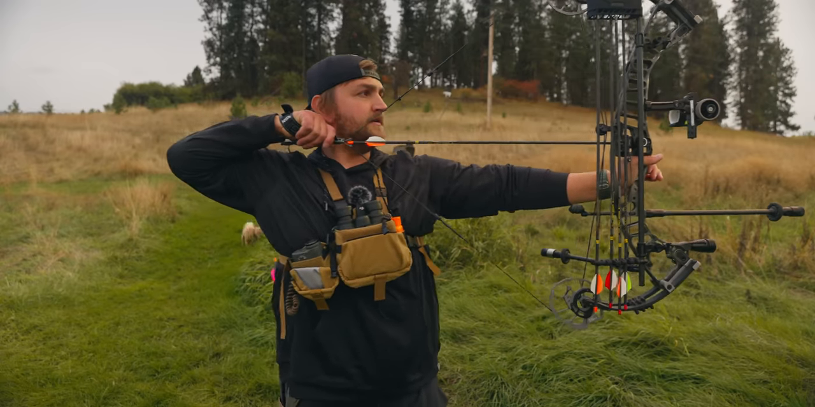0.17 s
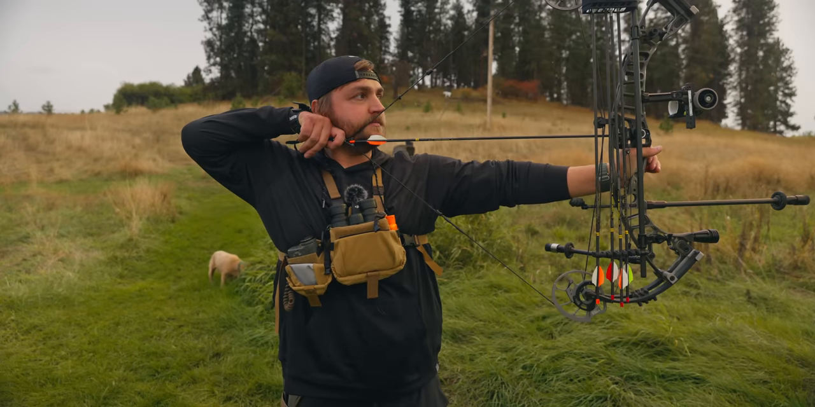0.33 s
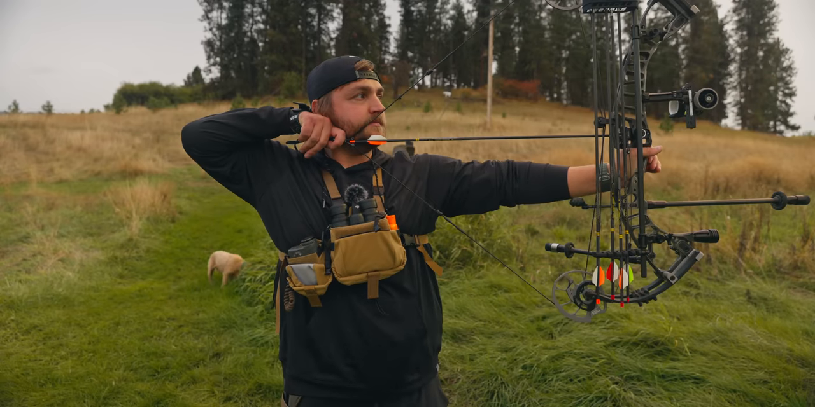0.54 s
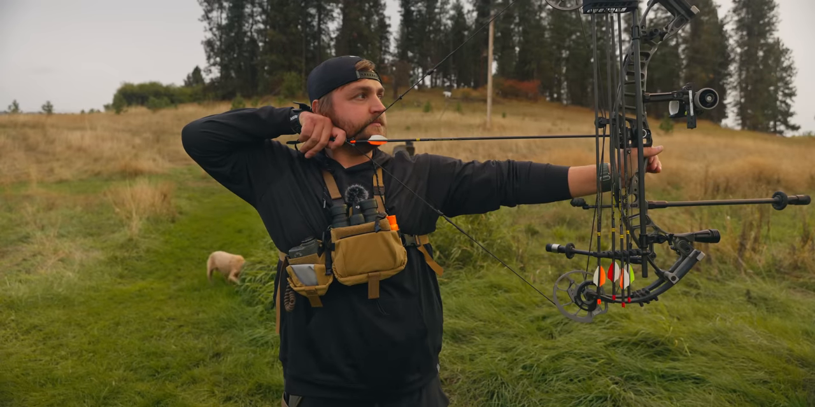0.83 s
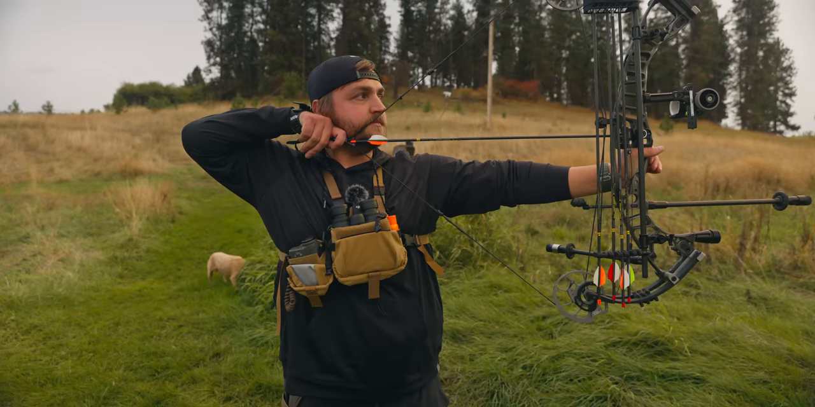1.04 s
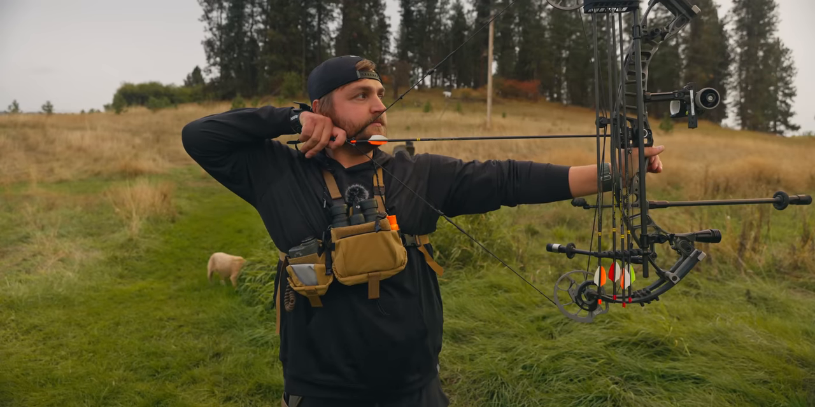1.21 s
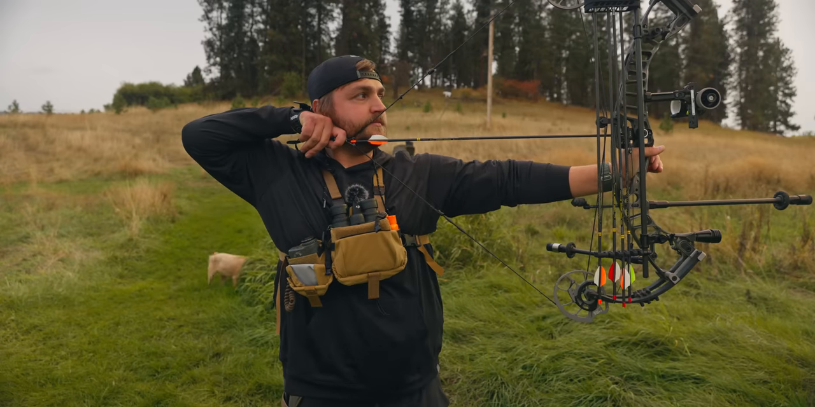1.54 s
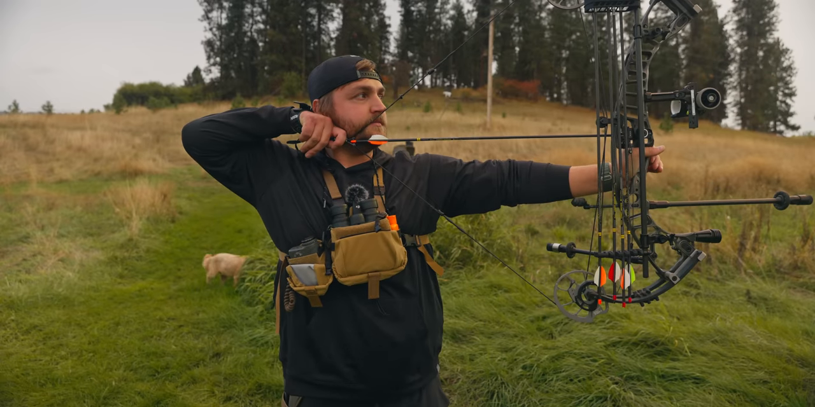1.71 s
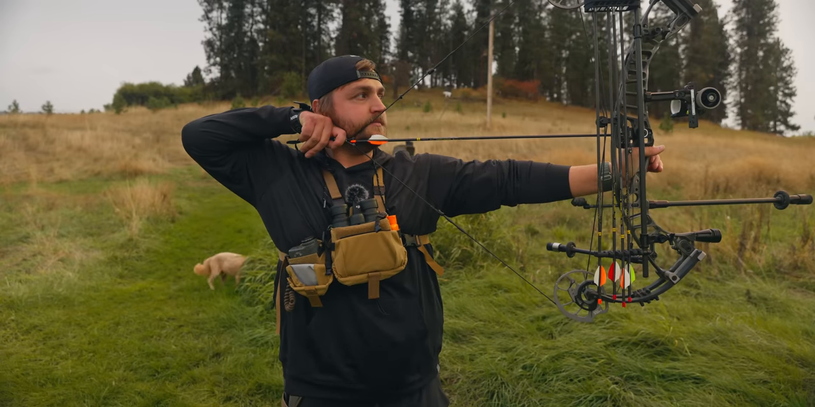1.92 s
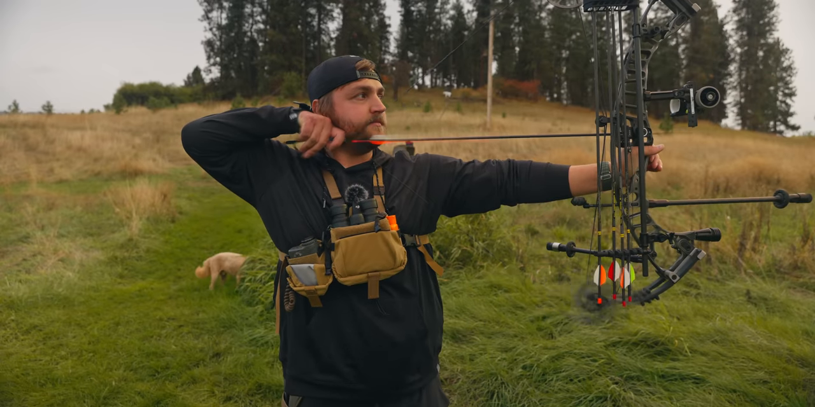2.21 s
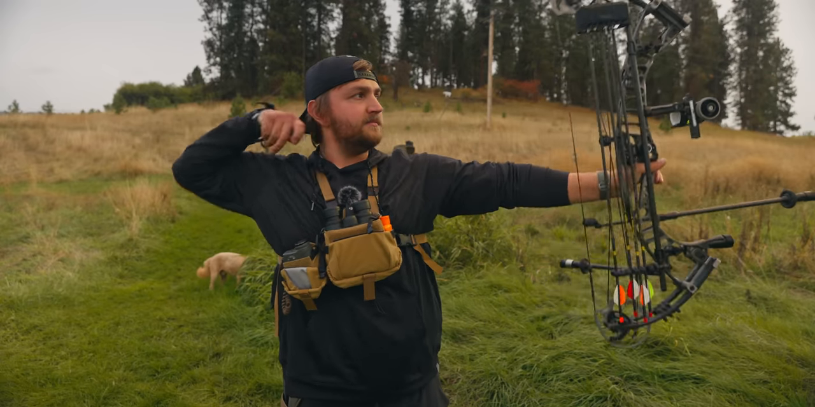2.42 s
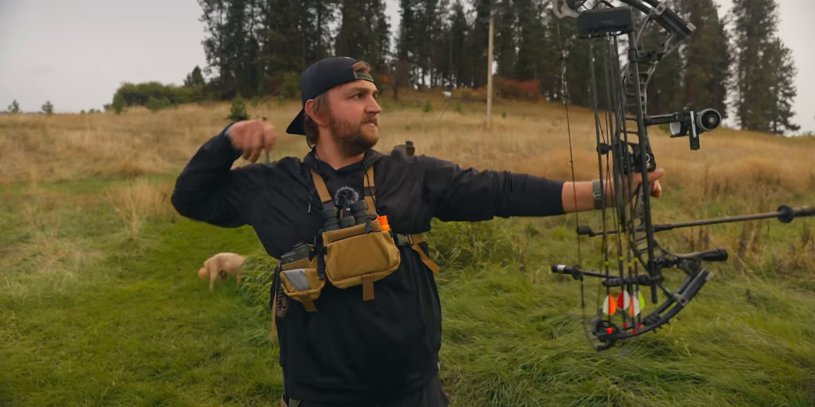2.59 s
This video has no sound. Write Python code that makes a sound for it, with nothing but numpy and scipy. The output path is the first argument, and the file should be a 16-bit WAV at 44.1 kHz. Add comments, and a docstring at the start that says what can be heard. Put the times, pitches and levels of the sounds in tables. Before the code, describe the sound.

Loud crack of a compound bow released outdoors, a brief twang, then faint rattling of loose parts

```python
"""Quiet meadow, one microphone: far wind in trees over microphone hiss, nearer 1-2 kHz wind noise that swells and dies
down, one coo of a far dove, then a light rustle of leaves, all shaped noise but the sine coo. A compound bow goes
off: its release aid clicks (ringing modes), the string whistles forward (gliding sine) and slaps its stop, limbs
and cables ring (decaying modes) under bursts of hiss. A loose part then rattles (taps and noise ticks), the bow
bumps in the hand (falling sines), and last some gear squeaks (narrow noise)."""
import sys
import numpy as np
from scipy import signal
from scipy.fft import rfft, irfft
from scipy.io import wavfile
from scipy.ndimage import uniform_filter1d

SR = 44100
rng = np.random.default_rng(int(sys.argv[2]) if len(sys.argv) > 2 else 0)


def store_pcm(level_fs):
    """Save levels as 16-bit WAV."""
    pcm = np.round(np.clip(level_fs, -1, 1) * 32767).astype(np.int16)
    wavfile.write(sys.argv[1], SR, np.atleast_2d(pcm).T)


N = 121275
T = np.arange(N) / SR  # s

# clicks of the release aid: t/s, level/dB, tilt/(dB per octave, about 6 kHz)
CLICKS = [(2.2868, -19.5, -1), (2.288, -6.5, 2.5), (2.2879, -12, -1), (2.2934, -5, 2), (2.2935, -8, -1.5),
          (2.2956, -27, -8)]
# modes of the release aid, before the common pitch factor in ring(): f/Hz, level/dB, t60/s
RELEASE_MODES = [(700, -16, 0.0033), (1920, -9, .003), (3760, -7, .003), (4600, -10.5, 0.0023),
                 (6060, -2, 0.0037), (7000, -22, .04), (7670, -3.5, 0.0036), (8900, -4, .003),
                 (10500, -8, 0.0033), (10960, -30, .04), (12600, -2.5, .004), (15100, -11, .0025)]
# blows of string and cables on their stops: t/s, level/dB, contact/s
BLOWS = [(2.3103, -13.5, .0002), (2.3114, -7, 0.0002), (2.3133, -2.5, .0001), (2.3162, -8, .00015),
         (2.3201, -9.5, 0.00043), (2.3255, -8, .0004), (2.338, -18, .0005), (2.346, -23, 0.00027)]
# short modes of limbs and riser, before the pitch factor: f/Hz, level/dB, t60/s
LIMB_MODES = [(264, -12, 0.041), (341, -9, 0.036), (520, -13.5, 0.036), (669, -13, .03),
              (777.5, -7.5, 0.041), (841, -7.5, 0.057), (950, -12, 0.035), (1057, -8.5, 0.018),
              (1186, -9, .015), (1266, -2.5, 0.022), (1520, -13.5, .015), (1690, -4, 0.018)]
# string and cables humming on, before the pitch factor: f/Hz, level/dB, t60/s, rise/s
CABLE_MODES = [(152, -29, 0.13, 0.0053), (266.6, -28, .2, .01), (385, -35, 0.48, .06),
               (512, -13.5, .11, .02), (543.2, -17.5, .12, .02), (588, -1.5, 0.14, .04),
               (741, -18.5, 0.22, 0.011), (785, -17.5, 0.13, 0.008), (881.6, -24, 0.11, 0.03),
               (1214, -40.5, 0.16, .01)]
# layers of hiss around the shot: start t/s, rise/s, level/dB, t60/s, centre f/Hz, one-pass width/Hz
HISS_LAYERS = [(2.3085, .0025, -14, .022, 12500, 6000), (2.305, .006, -17, 0.061, 7000, 11000),
               (2.311, .004, -33, 0.16, 9000, 14000), (2.311, .003, -24.5, .1, 1400, 1800),
               (2.32, .02, -52, .8, 1600, 2600), (2.32, .02, -59.5, .9, 9000, 7000),
               (2.32, .02, -43.5, 0.61, 600, 1100), (2.287, .001, -28, .1, 5000, 18000),
               (2.295, .012, -31.5, .05, 1800, 2200)]
# low taps of a loose part: t/s, level/dB
TAPS = [(2.4104, -50.5), (2.4324, -48), (2.4594, -50), (2.5097, -49.5), (2.5356, -50), (2.5624, -58),
        (2.5915, -53), (2.6224, -53), (2.6524, -52), (2.6798, -53)]
# modes of that part, before each tap's own pitch scatter: f/Hz, level/dB, t60/s
TAP_MODES = [(2079, 1.5, 0.019), (2525, -1.5, 0.0124)]
# bright ticks of the same rattle: t/s, level/dB
TICKS = [(2.4054, -56), (2.4524, -57), (2.4922, -51), (2.5199, -52), (2.5461, -51), (2.5734, -64),
         (2.6024, -57), (2.6335, -61), (2.7274, -58)]
# noise bands of a tick: f/Hz, one-pass width/Hz, level/dB
TICK_BANDS = [(5500, 1500, -14), (8800, 2300, -9), (11400, 2500, -7)]
# bumps of the bow in the hand: t/s, level/dB, start f/Hz, end f/Hz, t60/s
BUMPS = [(2.482, -43, 400, 140, 0.11), (2.492, -54, 110, 85, 0.075), (2.498, -48.5, 298, 145, 0.0366),
         (2.564, -56, 130, 120, 0.046), (2.62, -46, 590, 240, 0.027)]
# strokes of a thin squeaky scrape of gear: t/s, length/s, level/dB
STROKES = [(2.66, 0.076, -78.5), (2.70, 0.025, -74), (2.727, .015, -69), (2.738, .03, -69)]
# resonances of the scrape: f/Hz, one-pass width/Hz, level/dB
SQUEAK_BANDS = [(4450, 326, 0.5), (5000, 800, -4), (5720, 400, -6), (12320, 300, -10.5), (3000, 3000, -0.5),
                (9500, 6500, -2.5)]
# light rustle of leaves in the treble: t/s, level/dB
RUSTLE = [(1.35, -100), (1.6, -85), (1.82, -78), (1.95, -96)]
# wind in the 1-2 kHz range that swells a little, then dies down: t/s, level/dB
WIND = [(0, -80.5), (.45, -75.5), (1, -78.5), (1.3, -93)]
# spectrum of the meadow, relative (its overall level is set below): f/Hz, level/(dB per Hz)
MEADOW_SPECTRUM = [(18, -63), (30, -33.5), (118, -7), (199, -9), (239, -4.5), (437, -1), (780, -1.5),
                   (1070, -8), (1760, -14.5), (2060, -20), (3310, -25), (13700, -23.5), (16000, -28.5)]

WHISTLE_S, WHISTLE_LENGTH_S = 2.3045, 0.0069
WHISTLE_FROM_HZ, WHISTLE_TO_HZ = 1900, 4100
WHISTLE_END_DB, WHISTLE_SWELL_DB = -16.5, 6.5
CABLES_S, CABLES_WAVER_DB = 2.312, 1.5
RELEASE_CUT_HZ, LIMBS_CUT_HZ = 610, 203  # small bodies radiate little below these
TAP_RISE_S, TAP_SCATTER, TICK_T60_S = .0008, .04, 0.01  # scatter: relative spread of pitch
BUMP_GLIDE_S = 0.0043  # time constant of the pitch drop
BOW_CUT_HZ, BUMP_CUT_HZ = 84, 62
COO_S, COO_LENGTH_S, COO_EDGE_S = .803, 0.18, 0.0106
COO_START_HZ, COO_SAG_HZ_PER_S = 616, 57
COO_DB, COO_WAVER_DB, COO_THROB_HZ, COO_THROB_DB = -60, 1.5, 18, 2.5
RUSTLE_HZ, RUSTLE_WIDTH_HZ = 6500, 8200
WIND_HZ, WIND_WIDTH_HZ = 1600, 1500
MEADOW_DB, SWELL_DB, FLICKER_DB = -64.5, .5, 1
OPENING_DB, OPENING_S = 0.5, .2  # extra level at the start and its time constant
TOP_HZ = 15900


def release_clicks():
    """The small body of the release aid rings at each click, tilted duller or brighter."""
    clicks = sum(undb(db) * ring(s, RELEASE_MODES, tilt_db=tilt) for s, db, tilt in CLICKS)
    return high(clicks, RELEASE_CUT_HZ)


def string_whistle():
    """The string sings higher and louder as it speeds through the air."""
    progress = np.clip((T - WHISTLE_S) / WHISTLE_LENGTH_S, 0, 1)
    hz = WHISTLE_FROM_HZ + (WHISTLE_TO_HZ - WHISTLE_FROM_HZ) * progress
    edge = np.clip(np.minimum(progress, 1 - progress) / .15, 0, 1)
    gain = undb(WHISTLE_END_DB + WHISTLE_SWELL_DB * (progress - 1))
    return gain * edge * np.sin(2 * np.pi * np.cumsum(hz) / SR)


def limb_blows():
    """String and cables strike their stops and set limbs and riser ringing."""
    blows = sum(undb(db) * ring(s, LIMB_MODES, contact=contact) for s, db, contact in BLOWS)
    return high(blows, LIMBS_CUT_HZ)


def cable_hum():
    """String and cables take up the swing and hum on, each mode wavering in level."""
    out = 0
    for hz, db, t60, rise in CABLE_MODES:
        waver = undb(CABLES_WAVER_DB * walk(40))
        out = out + ring(CABLES_S, [(hz, db, t60)], rise=rise) * waver
    return out


def shot_hiss():
    """Bursts of noise stand for string, arrow and field echoes: each rises, then decays."""
    out = 0
    for s, rise, db, t60, hz, width in HISS_LAYERS:
        onset = np.clip((T - s) / rise, 0, 1) ** 2
        decay = fall(np.abs(T - s - rise), t60)  # highest where the rise ends
        out = out + undb(db) * onset * decay * band(hz, width)
    return out


def rattle():
    """A loose part: ringing taps, each a little off in pitch, and short ticks of noise."""
    taps = 0
    for s, db in TAPS:
        stretch = 1 + TAP_SCATTER * rng.standard_normal()
        taps = taps + undb(db) * ring(s, TAP_MODES, rise=TAP_RISE_S, stretch=stretch)
    tick_env = sum(undb(db) * fall(T - s, TICK_T60_S) for s, db in TICKS)
    return taps + tick_env * bands(TICK_BANDS)


def bumps():
    """Soft thuds of the bow in the hand: decaying sines that drop in pitch."""
    out = 0
    for s, db, from_hz, to_hz, t60 in BUMPS:
        t = np.maximum(T - s, 0)
        glide_turns = (from_hz - to_hz) * BUMP_GLIDE_S * (1 - np.exp(-t / BUMP_GLIDE_S))
        out = out + undb(db) * fall(T - s, t60) * np.sin(2 * np.pi * (to_hz * t + glide_turns))
    return out


def squeak():
    """Gear scrapes: half-sine strokes of noise in several resonances."""
    env = sum(undb(db) * np.sin(np.pi * np.clip((T - s) / length, 0, 1)) for s, length, db in STROKES)
    return env * bands(SQUEAK_BANDS)


def dove():
    """Far off, one soft, throbbing, slightly sagging sine note."""
    t = T - COO_S
    throb = -COO_THROB_DB * np.cos(2 * np.pi * COO_THROB_HZ * t)
    level = undb(COO_DB + COO_WAVER_DB * walk(30.6) + throb)
    edge = np.clip(np.minimum(t, COO_LENGTH_S - t) / COO_EDGE_S, 0, 1)
    turns = COO_START_HZ * t - COO_SAG_HZ_PER_S * t ** 2 / 2
    return np.sqrt(2) * edge * level * np.sin(2 * np.pi * turns)


def rustle():
    """A brief airy swell of leaves: broad treble noise."""
    return curve(RUSTLE) * band(RUSTLE_HZ, RUSTLE_WIDTH_HZ)


def wind_lull():
    """Wind in the 1-2 kHz range, a band of noise that swells a little, then dies down."""
    return curve(WIND) * band(WIND_HZ, WIND_WIDTH_HZ)


def meadow():
    """Far wind in trees over microphone hiss; low bands swell and flicker, a little louder at first."""
    f = np.maximum(np.fft.rfftfreq(N, 1 / SR), 1)
    table_hz, table_db = np.transpose(MEADOW_SPECTRUM)
    shape = undb(np.interp(np.log(f), np.log(table_hz), table_db))
    spec = rfft(rng.standard_normal(N)) * shape
    swell = SWELL_DB * walk(1.5) + OPENING_DB * np.exp(-T / OPENING_S)
    out = 0
    for octave in np.arange(4., 15.):  # overlapping bands centred on 2 ** octave Hz
        part = irfft(spec * np.clip(1 - np.abs(np.log2(f) - octave), 0, 1), N)
        windy = 1 / (1 + (2 ** octave / 2500) ** 2)  # the hiss on top stays steadier
        out = out + part * undb(windy * (swell + FLICKER_DB * walk(13)))
    return unit(out) * undb(MEADOW_DB)


def ring(start, modes, tilt_db=0., contact=0., rise=1e-5, stretch=0.9928):
    """One blow on a set of modes; longer contact dulls the high ones, stretch scales every pitch."""
    out = np.zeros(N)
    i = int(start * SR)
    for hz, db, t60 in modes:
        t = np.maximum(T[i:i + int(1.5 * t60 * SR)] - start, 0)
        dulling = np.hypot(1, 2 * np.pi * hz * contact)
        gain = undb(db + tilt_db * np.log2(hz / 6000)) / dulling
        env = (1 - np.exp(-t / rise)) ** 2 * fall(t, t60)
        out[i:i + len(t)] += gain * env * np.sin(2 * np.pi * hz * stretch * t)
    return out


def fall(t, t60):
    """Exponential decay by 60 dB in t60, from t = 0; silent before."""
    return (t >= 0) * np.exp(-np.log(1000) * np.maximum(t, 0) / t60)


def band(hz, width_hz):
    """Noise through one resonance twice, rms 1; the second pass narrows it."""
    b, a = signal.iirpeak(hz, hz / width_hz, fs=SR)
    once = signal.lfilter(b, a, rng.standard_normal(N))
    return unit(signal.lfilter(b, a, once))


def bands(table):
    """Sum of noise bands at their levels."""
    return sum(undb(db) * band(hz, width) for hz, width, db in table)


def walk(rate):
    """Random levels drawn at rate/Hz, smoothed twice, spread near 1."""
    k = int(SR / rate)
    steps = np.repeat(rng.standard_normal(N // k + 1), k)
    return 1.3 * uniform_filter1d(uniform_filter1d(steps, k), k)[:N]


def curve(points):
    """Gain over time from t/s, level/dB points."""
    t, db = np.transpose(points)
    return undb(np.interp(T, t, db))


def high(x, hz):
    """Second-order high-pass."""
    return signal.sosfilt(signal.butter(2, hz, "high", fs=SR, output="sos"), x)


def undb(db):
    """dB to gain."""
    return 10 ** (np.asarray(db) / 20)


def unit(x):
    """Scale to rms 1."""
    return x / np.sqrt(np.mean(x ** 2))


def scene():
    """Everything at one microphone; the bow radiates no deep bass."""
    shot = release_clicks() + string_whistle() + limb_blows() + cable_hum() + shot_hiss()
    bow = high(high(shot + rattle(), BOW_CUT_HZ), BOW_CUT_HZ)
    thuds = high(high(bumps(), BUMP_CUT_HZ), BUMP_CUT_HZ)
    background = dove() + rustle() + wind_lull() + meadow()
    return (bow + thuds + squeak() + background)[None]


def record(dry):
    """Peaks clip just under full scale, then a steep low-pass cuts the top."""
    clipped = np.clip(dry, -.98, .98)
    return signal.sosfilt(signal.ellip(10, .2, 60, TOP_HZ, fs=SR, output="sos"), clipped)


dry = scene()
out = record(dry)
store_pcm(out)
```